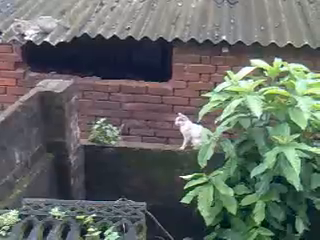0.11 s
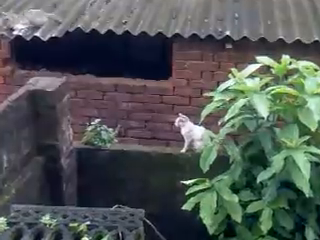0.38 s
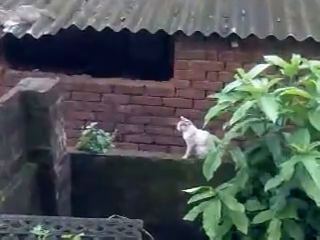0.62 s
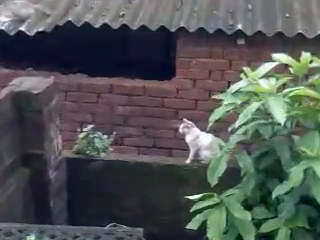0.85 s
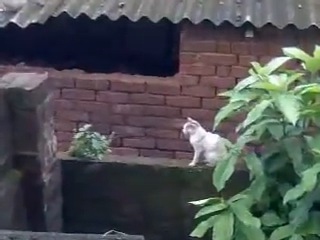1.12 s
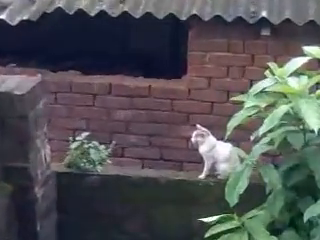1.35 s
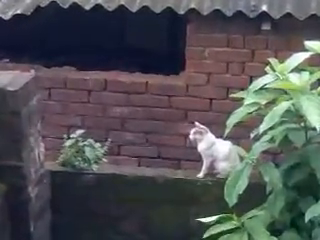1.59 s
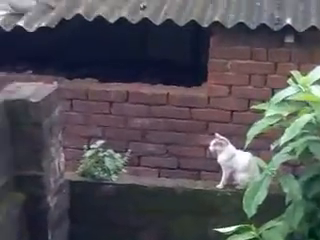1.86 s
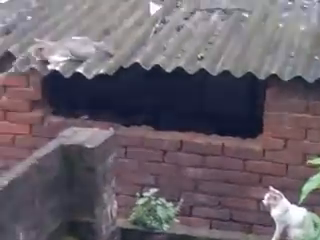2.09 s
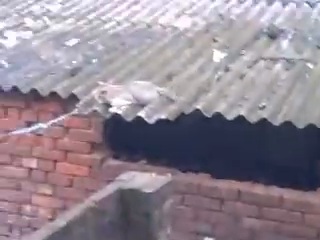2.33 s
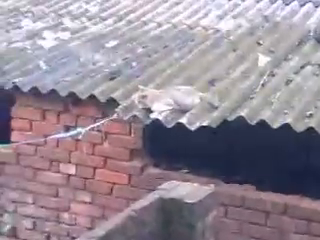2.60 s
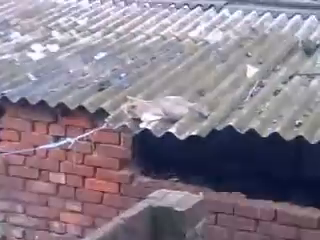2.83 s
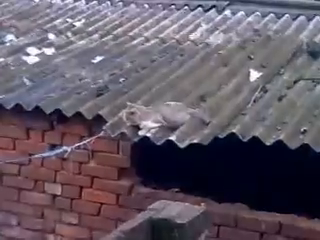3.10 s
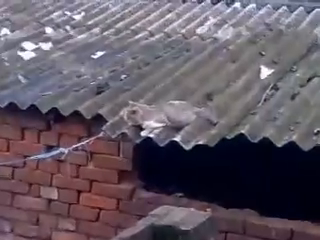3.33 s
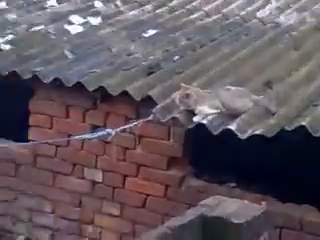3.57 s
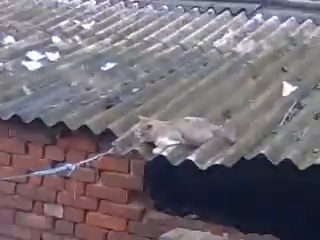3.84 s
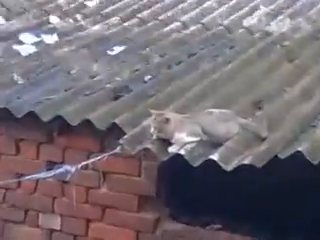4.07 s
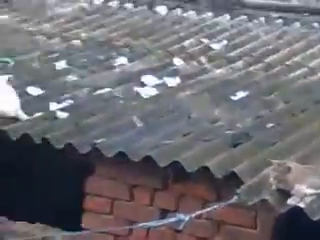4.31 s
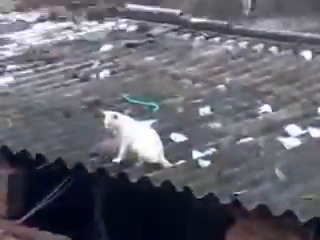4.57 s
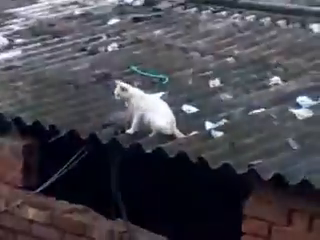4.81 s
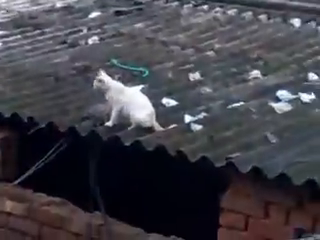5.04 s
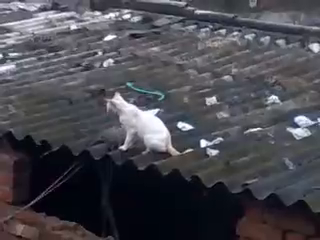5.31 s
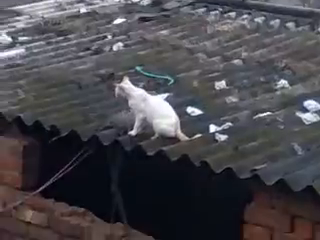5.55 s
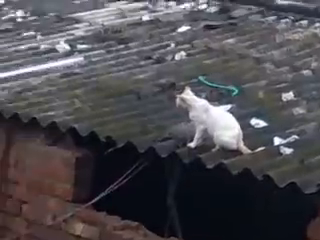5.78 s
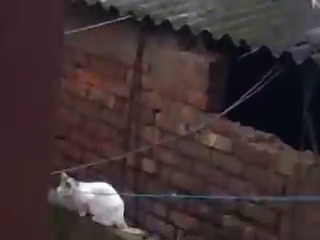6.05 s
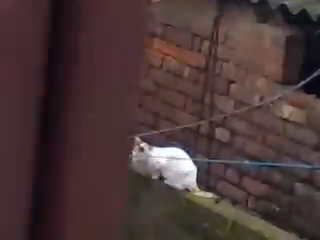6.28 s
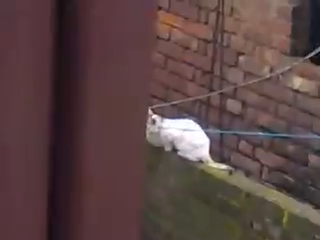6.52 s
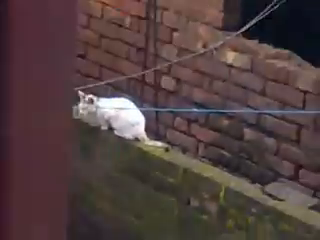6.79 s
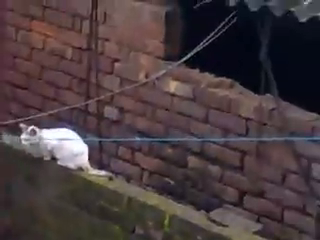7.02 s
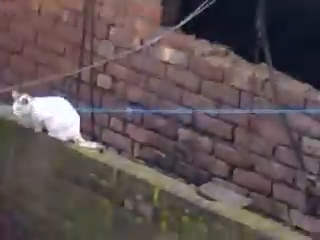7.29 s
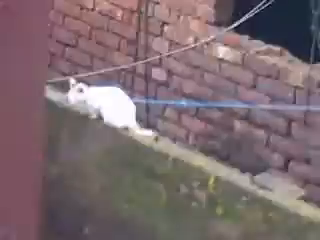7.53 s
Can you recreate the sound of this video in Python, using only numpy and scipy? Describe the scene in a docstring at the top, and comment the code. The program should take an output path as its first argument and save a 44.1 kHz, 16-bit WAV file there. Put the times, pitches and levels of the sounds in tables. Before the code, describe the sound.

A blade chops sharply through fish onto a wooden block at uneven intervals, dull thumps between, over faint outdoor town hum and blurred distant calls.

```python
"""Outdoors, a blade chops through fish onto a wooden block, each contact ringing the block's modes.
Dull thumps, damped low modes with a gentle knock, fall among the chops. Behind lie far town noise in drifting
bands with a wavering hum, faint distant calls as blurred gliding tones, and one brief bright hiss.
A small recorder crackles once as it starts, pushes steady noise down but lets it swell, then sink after
loud sounds, and overloads on the chops."""
import sys
import numpy as np
from scipy import signal
from scipy.io import wavfile
from scipy.ndimage import uniform_filter1d

SR = 44100
rng = np.random.default_rng(int(sys.argv[2]) if len(sys.argv) > 2 else 0)


def invert_db(level):
    """Linear amplitude ratio for a level in decibels (20 dB per decade), elementwise."""
    return 10 ** (np.asarray(level, dtype=float) / 20)


def output_pcm(signal):
    """Save a mono or channel-first signal as 16-bit PCM at the path in sys.argv[1].

    Samples are clipped to [-1, 1] before scaling.
    """
    pcm = np.clip(np.atleast_2d(signal).T, -1, 1) * 32767
    wavfile.write(sys.argv[1], SR, np.round(pcm).astype(np.int16))


N = 337181


def rms_one(x):
    """Scale to unit rms."""
    return x / np.sqrt(np.mean(x ** 2) + 1e-20)


def drift(knots_per_s):
    """Slow random curve of spread near 1: straight lines between random knots."""
    knots = rng.standard_normal(400)
    return np.interp(np.arange(N) / SR * knots_per_s, np.arange(400), knots) * 1.2


def ring(x, hz, t60_s):
    """Two-pole resonator: a unit click sets a decaying sine of height 1 ringing."""
    r = invert_db(-60 / (t60_s * SR))
    w = 2 * np.pi * hz / SR
    return signal.lfilter([0, np.sin(w)], [1, -2 * r * np.cos(w), r * r], x + 1e-18)


def add(out, start_s, x):
    """Mix x into out from start_s on."""
    i = int(start_s * SR)
    out[i:i + len(x)] += x[:N - i]


# Contacts of blade and block. Each row: start in seconds, relative blow level in dB, edge brightness in dB
# per octave, favoured pitch in Hz, ring length as a factor (at least 0.2 is used).
CHOPS = [(1.6766, -2, 4, 1750, 0.42), (1.6784, -3.5, -1.5, 586, 0.88), (2.7467, -1.5, 4, 750, 0.47),
         (4.4116, 0, 0, 895, 0.15), (4.4126, 1.5, -10, 980, 1.1), (4.4174, -4.5, -6.5, 1010, 1.2),
         (4.4222, -19, -1.5, 980, 0.78), (5.332, 0, 3, 657, 0.47), (6.1772, 1.5, -1, 990, 0.5),
         (6.1779, -3, -10, 770, 1.13), (6.1830, -6, -12, 1010, 0.43), (7.2098, -13, -4, 815, 0.75)]
BRIGHT_FROM_HZ = 1234
CONTACT_MS, DULL_STRETCH = 0.2, 0.98  # contact at brightness 0; dB of lengthening per dB per octave of dullness


def chops():
    """The edge goes through flesh and bone, lands and rebounds; each brief contact rings the block."""
    out = np.zeros(N)
    hz = np.array(BLOCK)[:, 0]
    for start_s, blow_db, bright_db, favoured_hz, ringing in CHOPS:
        contact_ms = max(CONTACT_MS * invert_db(-DULL_STRETCH * bright_db), .06)
        time_ms = np.arange(4000) / SR * 1000
        force = np.sin(np.pi * np.clip(time_ms / contact_ms, 0, 1)) ** 2
        # where the edge lands favours some modes
        spot_db = 6 * np.exp(-(np.log2(hz / favoured_hz) / 0.76) ** 2)
        tilt_db = bright_db * np.maximum(np.log2(hz / BRIGHT_FROM_HZ), 0)
        chance_db = rng.normal(0, 2.2, len(BLOCK))
        hit = block(force / force.sum(), spot_db + tilt_db + chance_db, ringing)
        add(out, start_s, invert_db(blow_db) * hit)
    return out


# Modes of the wooden block. Each row: pitch in Hz, relative level in dB, t60 in seconds at ring factor 1.
BLOCK = [(404, -27.5, 0.0033), (615, -6, 0.022), (830, -8, 0.0071), (990, -8.5, 0.03), (1346, -0.5, 0.014),
         (1726, -9.5, 0.038), (2456, -5, 0.021), (3050, -16.5, 0.035), (3550, -11, 0.017),
         (4320, -6.5, 0.01), (4920, -8.5, 0.0091), (5500, -12.5, 0.008), (7420, -15, 0.0075)]


def block(force, gains_db, ringing):
    """The block's modes, all driven by one force; a small block radiates little bass."""
    modes = 0
    for (hz, db, t60_s), gain_db in zip(BLOCK, gains_db):
        modes = modes + invert_db(db + gain_db) * ring(force, hz, t60_s * max(ringing, .2))
    return signal.lfilter(*signal.butter(2, 420, "high", fs=SR), modes)


# Each row: start in seconds, peak of the low mode in dB, its pitch in Hz, its t60 in seconds (at least
# 0.005 is used), relative level of the woody knock in dB.
THUMPS = [(2.239, -7.5, 154, 0.0087, -17), (2.432, -14, 176, 0.016, -26), (2.689, -6.5, 214, 0.017, -11),
          (2.992, -10, 160, 0.0072, -9.5), (3.813, -16, 59, 0.051, -47), (4.483, -8.5, 504, 0.019, -11),
          (4.488, -16.5, 87, 0.028, -53), (4.558, -0.5, 192, 0.0058, -59), (4.604, -33, 300, 0.023, -27),
          (7.2108, -11.5, 225, 0.053, -46)]


def thumps():
    """A soft push rings one heavily damped low mode, with little deep bass, and knocks the block gently."""
    out = np.zeros(N)
    for start_s, peak_db, hz, t60_s, knock_db in THUMPS:
        push = np.pad(np.hanning(int(.3 * SR / hz)), (0, 5000))
        low = ring(push, hz, max(t60_s, .005))
        low = signal.lfilter(*signal.butter(2, 0.47 * hz, "high", fs=SR), low)
        add(out, start_s, invert_db(peak_db) * low / np.max(np.abs(low)))
        tap = np.pad(np.hanning(26) / 12, (int(.0015 * SR), 3000))  # 1.5 ms after the push starts
        knock = block(tap, rng.normal(0, 1.3, len(BLOCK)), ringing=0.12)
        add(out, start_s, invert_db(knock_db) * knock)
    return out


# Each row: start in seconds, end in seconds, first pitch in Hz, last pitch in Hz, rms in dB before the
# fades and echoes, with the suppressor shut.
CALLS_FAR = [(.30, 0.40, 960, 954, -48), (.51, 0.585, 2820, 2820, -64), (3.155, 3.26, 1930, 1920, -47),
             (3.3, 3.403, 1930, 1870, -48.5), (3.17, 3.25, 1500, 1480, -53), (3.19, 3.26, 2340, 2350, -56),
             (4.46, 4.759, 2797, 2770, -60.5), (5.0, 5.074, 515, 509, -48), (6.13, 6.451, 1600, 1465, -52),
             (6.2, 6.367, 1400, 1337, -54), (6.555, 6.74, 1503, 1460, -53.5),
             (6.84, 7.272, 2800, 2890, -63), (6.84, 7.221, 3180, 3110, -67), (7.46, 7.705, 2280, 2730, -56)]
# Echoes off far walls. Each row: delay in seconds, level in dB relative to the call.
CALL_ECHOES = [(.045, -5.5), (.09, -9.5)]
CALL_BLUR, CALL_FADE_S = .035, .025  # bandwidth as a share of pitch; swell and fade


def distant_calls():
    """Blurred gliding tones: a sine whose height and phase wander within a narrow band, with echoes."""
    out = np.zeros(N)
    for start_s, end_s, first_hz, last_hz, level_db in CALLS_FAR:
        n = int((end_s - start_s) * SR)
        r = np.exp(-np.pi * CALL_BLUR * first_hz / SR)
        noise = rng.standard_normal((2, SR))
        wander = signal.lfilter([1], [1, -2 * r, r * r], noise[0] + 1j * noise[1])[-n:]
        turn = np.exp(1j * np.angle(wander))
        blur = (rms_one(np.abs(wander)) + 0.6) * turn
        hz = last_hz + (first_hz - last_hz) * np.linspace(1, 0, n) ** 2
        tone = np.real(blur * np.exp(2j * np.pi * np.cumsum(hz) / SR))
        to_nearest_end = np.minimum(np.arange(n), np.arange(n)[::-1])
        fade = np.clip(to_nearest_end / (CALL_FADE_S * SR), 0, 1)
        add(out, start_s, invert_db(level_db) * rms_one(tone) * fade)
    echoes = sum(invert_db(db) * np.pad(out, (int(s * SR), 0))[:N] for s, db in CALL_ECHOES)
    return out + echoes


PUFF_S, PUFF_RISE_S, PUFF_LENGTH_S = .505, .025, .16
PUFF_LOW_HZ, PUFF_HIGH_HZ, PUFF_DB = 2000, 5800, -60  # dB with the suppressor shut


def puff():
    """A brief bright hiss: band-passed noise swells quickly and fades away."""
    sos = signal.butter(6, [PUFF_LOW_HZ, PUFF_HIGH_HZ], "band", fs=SR, output="sos")
    noise = signal.sosfilt(sos, rng.standard_normal(N))
    age_s = np.arange(N) / SR - PUFF_S
    shape = np.interp(age_s, [0, PUFF_RISE_S, 3 * PUFF_RISE_S, PUFF_LENGTH_S], [0, 1, .8, 0])
    return invert_db(PUFF_DB) * rms_one(noise) * shape


# Each row: time in seconds, level in dB with the suppressor shut, gain of the rumble below 300 Hz in dB.
TOWN = [(.2, -51.5, 0), (.4, -48.5, -5.5), (.75, -52.5, 0), (1.5, -44.5, -3.5), (2.2, -45, -1),
        (3.3, -43.5, -3.5), (3.9, -45.5, 2.5), (4.4, -43.5, 0.4), (5.1, -48.5, 2.5), (5.7, -45, 0),
        (6.3, -43.5, 1.2), (6.8, -46, -1), (7.099, -43, 0.5), (7.65, -45.5, 1.5)]
# Colour of the noise. Each row: frequency in Hz, relative density in dB per Hz.
AIR = [(15, -39.5), (25, -12.5), (43, -0.5), (122, 1.5), (159, -4.5), (196, 0), (301, -8.5), (355, 0),
       (507, -4.5), (1440, -5.5), (1960, -11), (2600, -13), (3800, -26.5), (5820, -30), (7200, -44),
       (9360, -58.5), (15800, -120)]
AIR_EDGE_HZ, HISS_DB = 7990, 1.5  # HISS_DB lifts the bands above 1800 Hz
HUM_HZ, HUM_WIDTH_HZ, HUM_DB = 361.4, 35, -8.5  # HUM_DB: mean level over the noise


def town(patchy_db):
    """Third-octave bands of noise, each flickering by patchy_db, and a narrow wavering hum."""
    time_s, level_db, rumble_db = np.transpose(TOWN)
    air_hz, air_db = np.transpose(AIR)
    time = np.arange(N) / SR
    edges_hz = 22 * 2 ** np.arange(0, 8.7, 1 / 3)
    rumble = invert_db(np.interp(time, time_s, rumble_db))
    white = rng.standard_normal((2, N))
    out = np.zeros(N)
    for k, (low, high) in enumerate(zip(edges_hz, edges_hz[1:])):
        sos = signal.butter(2, [low, high], "band", fs=SR, output="sos")
        band = signal.sosfilt(sos, white[k % 2])  # neighbours use separate noises
        colour_db = np.interp(np.log(low * high) / 2, np.log(air_hz), air_db)
        weight = rumble if high < 300 else invert_db(HISS_DB) if low > 1800 else 1
        out += band * weight * invert_db(colour_db + patchy_db * drift(15))
    out = signal.sosfilt(signal.cheby2(12, 60, AIR_EDGE_HZ, fs=SR, output="sos"), out)
    hum = ring(rng.standard_normal(N), HUM_HZ, np.log(1000) / (np.pi * HUM_WIDTH_HZ))
    out = rms_one(out) + invert_db(HUM_DB + 0.57 * drift(5.9)) * rms_one(hum)
    return out * invert_db(np.interp(time, time_s, level_db))


def scene():
    """Blows over the background, which is raised by the depth the shut suppressor takes away."""
    background = town(patchy_db=.7) + distant_calls() + puff()
    return (chops() + thumps() + invert_db(DEPTH_DB) * background)[None]


def held(db, fall_db_per_s):
    """Follows rises at once and falls back at a steady rate."""
    fall = fall_db_per_s * np.arange(N) / SR
    return np.maximum.accumulate(db + fall) - fall


SHUT_DB, OPEN_DB = 1, 23  # level over usual: starts to open, fully open
DEPTH_DB, RELEASE_DB_PER_S = 17, 34.5
DUCK_DB, DUCK_ATTACK_S, RECOVERY_DB_PER_S = 5.5, 0.12, 6


def suppressor(x):
    """Gain sinks for steady sound, opens as the level jumps over its usual value and falls back steadily;
    after a loud sound it also ducks slowly and takes longer to recover."""
    power = uniform_filter1d(x ** 2, size=700, origin=90)
    level_db = 10 * np.log10(np.maximum(power, 0) + 1e-12)
    usual_db = uniform_filter1d(np.minimum(level_db, -26), size=30000)
    opening = np.clip((level_db - usual_db - SHUT_DB) / (OPEN_DB - SHUT_DB), 0, 1)
    open_db = uniform_filter1d(held(DEPTH_DB * opening ** 1.356, RELEASE_DB_PER_S), size=120)
    r = np.exp(-1 / (DUCK_ATTACK_S * SR))
    duck_db = signal.lfilter([1 - r], [1, -r], held(DUCK_DB * opening ** 2, RECOVERY_DB_PER_S))
    return x * invert_db(open_db - duck_db - DEPTH_DB)


CRACKLE_S, CRACKLE_LENGTH_S, CRACKLE_DB = .0540, .0036, -3  # CRACKLE_DB: ceiling


def start_crackle():
    """A short burst of fast-fading noise, low-passed and softly limited."""
    age_s = np.arange(N) / SR - CRACKLE_S
    gate = (age_s > 0) & (age_s < CRACKLE_LENGTH_S)
    burst = rng.standard_normal(N) * gate * invert_db(-2500 * np.clip(age_s, 0, .01))
    burst = signal.sosfilt(signal.butter(10, 6800, fs=SR, output="sos"), burst)
    return invert_db(CRACKLE_DB) * np.tanh(burst)


def top_cut(x):
    """Nothing passes above the cut-off."""
    return signal.sosfilt(signal.butter(12, 16660, fs=SR, output="sos"), x)


OPEN_S, BAND_EDGE_HZ = 0.217, 8430
INPUT_TOP, OVERLOAD = .74, .715  # clip heights before and after the band limit, full scale 1


def record(dry):
    """Silent until the input opens, but for one crackle; suppressor, overload, narrow band, a last hard top."""
    time = np.arange(N) / SR
    x = suppressor(dry[0]) * np.clip((time - OPEN_S) / 0.0026, 0, 1)
    x = np.clip(x + start_crackle(), -INPUT_TOP, INPUT_TOP)
    x = signal.sosfiltfilt(signal.cheby2(10, 30, BAND_EDGE_HZ, fs=SR, output="sos"), x)
    return top_cut(np.clip(x, -OVERLOAD, OVERLOAD)[None])


dry = scene()
out = record(dry)
output_pcm(out)
```